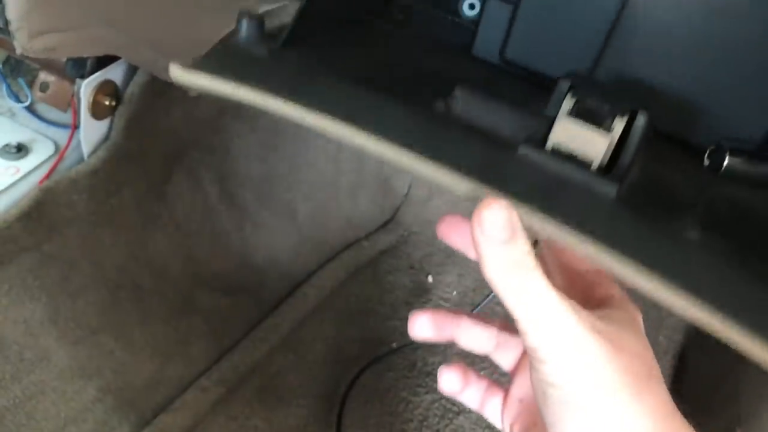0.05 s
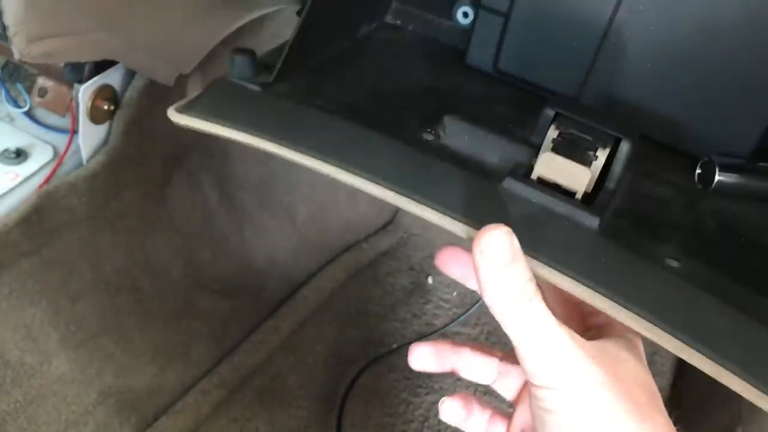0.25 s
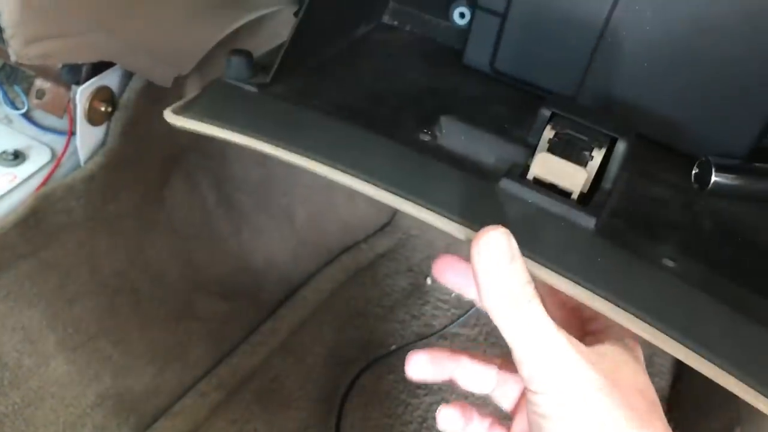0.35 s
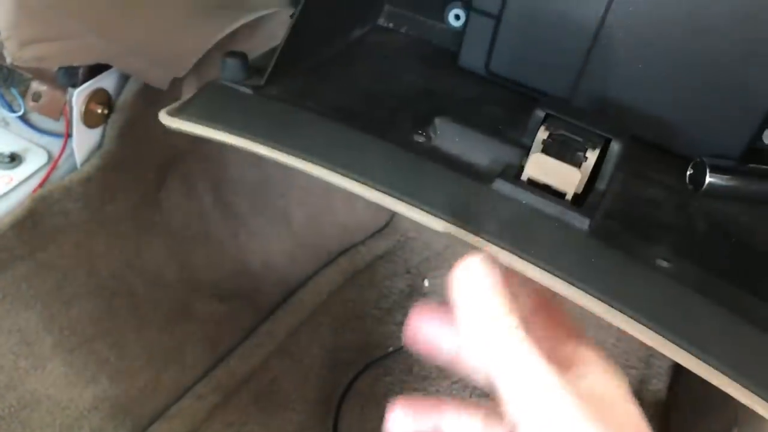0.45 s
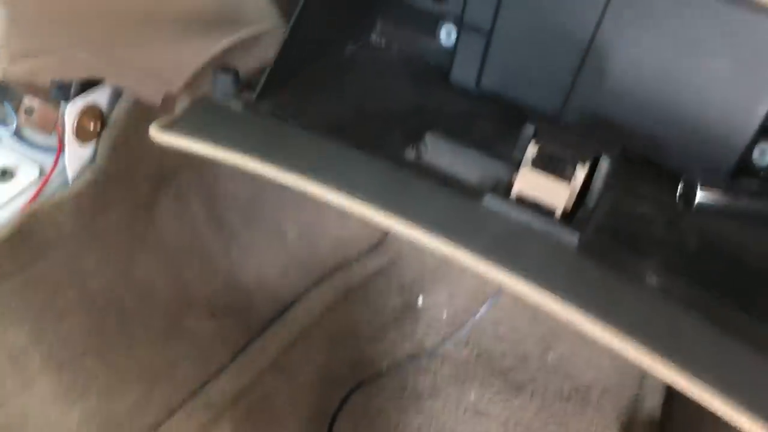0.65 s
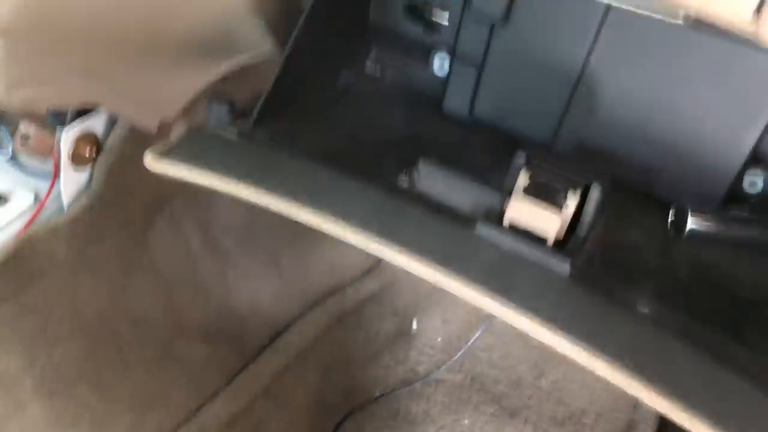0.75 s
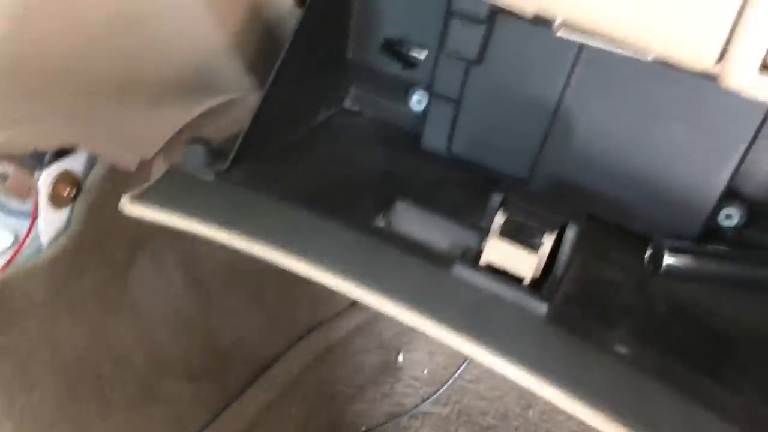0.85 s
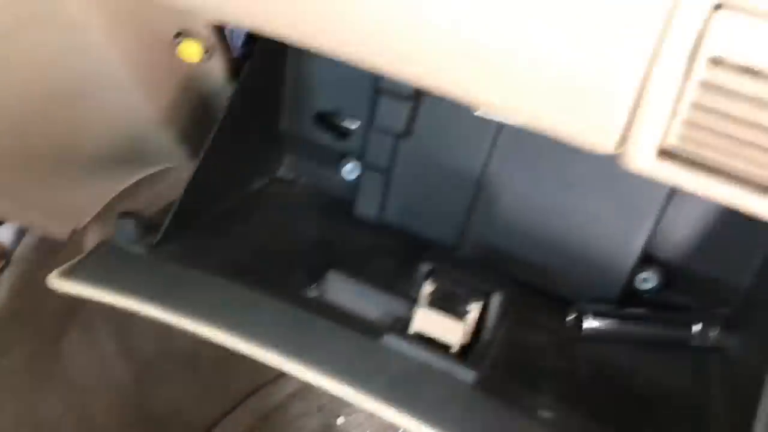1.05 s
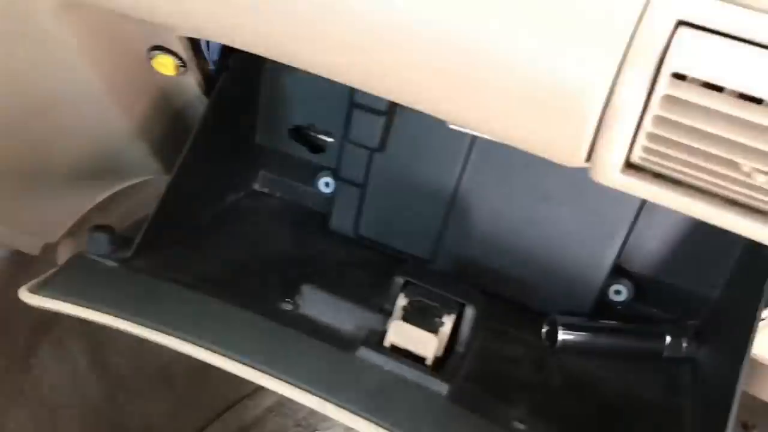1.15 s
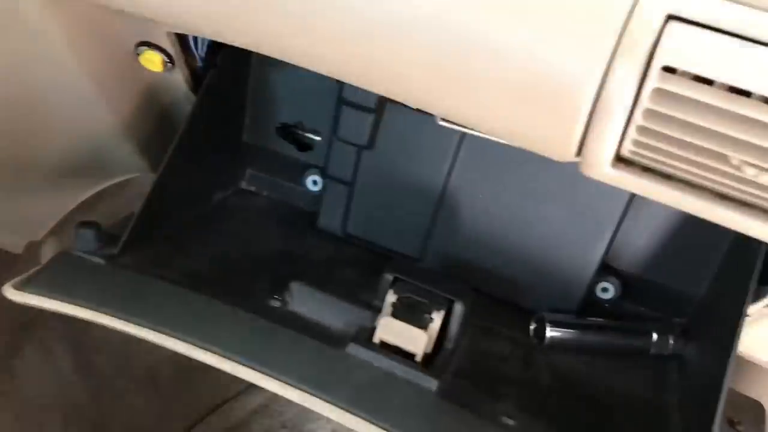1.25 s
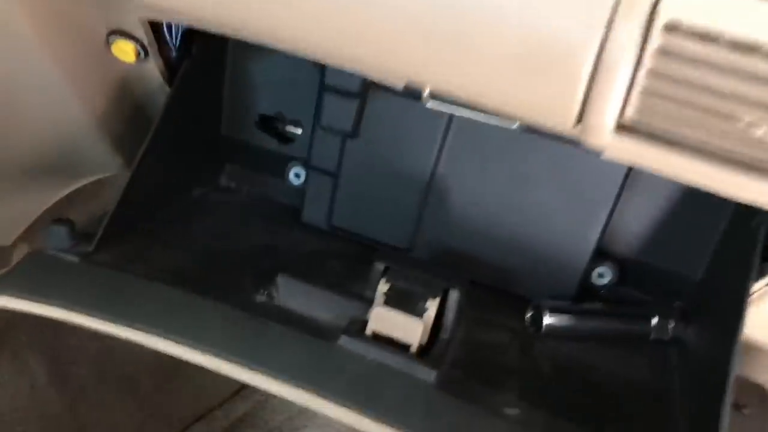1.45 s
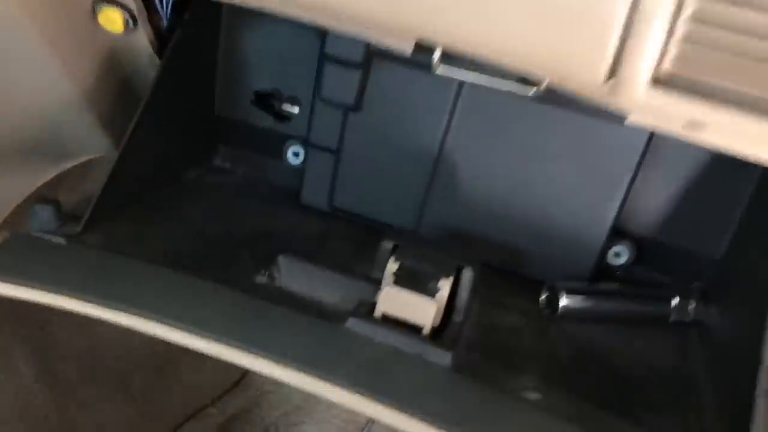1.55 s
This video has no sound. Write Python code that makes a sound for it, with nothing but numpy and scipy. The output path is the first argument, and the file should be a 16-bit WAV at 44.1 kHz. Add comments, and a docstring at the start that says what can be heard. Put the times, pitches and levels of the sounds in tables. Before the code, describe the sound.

Close by in a quiet, softly rumbling car, a glove compartment unlatches and its plastic lid creaks down, thuds against its stop and rebounds with a small rattle. Faint cloth rustling follows.

```python
"""A low rumble fills a quiet car as, close by, the glove compartment clicks and falls open.
The plastic lid scrapes and groans on its way down, and the latch clicks sharply.
The lid knocks against its stop, ringing the box behind it, then booms and rebounds while
loose parts rattle. The cabin adds a short echo. Afterwards a sleeve rustles faintly."""
import sys
import numpy as np
from scipy import signal
from scipy.fft import rfft, irfft
from scipy.io import wavfile

SR = 44100
rng = np.random.default_rng(int(sys.argv[2]) if len(sys.argv) > 2 else 0)


def master_out(mix):
    """Clip the mix to full scale and print it as 16-bit PCM to the path in sys.argv[1]."""
    frames = np.transpose(np.atleast_2d(mix))
    ceiling = np.clip(frames, -1, 1)
    pcm = np.round(ceiling * 32767).astype(np.int16)
    wavfile.write(sys.argv[1], SR, pcm)


N = 70560  # 1.6 seconds

# The cabin's rumble. Each row: frequency in Hz, strength in dB.
CABIN_COLOUR = [(15, -37), (27, -10), (40, 6.5), (75, -1), (92, -9), (113, -0.5), (140, -5), (200, -13),
                (300, -15.5), (430, -27.5), (700, -23), (1250, -24.5), (2700, -38), (4200, -40.5),
                (6000, -47), (15500, -51)]
# How fast the hum wavers. Each row: rate in Hz, strength in dB.
HUM_WAVER_RATES = [(1, 0), (12, 0), (40, -40), (1000, -100)]
CABIN_DB, HUM_DB, HUM_HZ, HUM_WAVER_HZ = -49, -52, 112.3, 5

# Latch and hinge clicks. Each row: start in seconds, level in dB, brightness in dB per octave.
LATCH_CLICKS = [(0.026, -48, -1), (0.1637, -42, 11), (.184, -40, 1.5), (.1975, -39, 7), (0.221, -26, 2.5),
                (0.2233, -36.5, -3.5), (0.2627, -35, 1.5), (0.3214, -44, 7), (0.3242, -35.5, 12),
                (0.349, -49, 5), (0.3772, -51, 8), (0.3965, -52, 10.5)]
# The tone of a click. Each row: frequency in Hz, strength in dB, seconds to fade by 60 dB.
LATCH_BANDS = [(247.24, -5.5, 0.15), (1100, 0.5, 0.045), (2130, -0.5, 0.041), (2780, -6, 0.033),
               (4100, -2, 0.04), (6700, -1, 0.028), (9970, -18.5, 0.057), (15552, -10.5, 0.025)]

# Blows on the lid: latch, hard stop, rebound, last taps. Each row: start in seconds,
# lid level in dB, box level in dB, panel level in dB, brightness in dB per octave.
LID_BLOWS = [(.0278, -54, -48.5, -49, 2), (0.224, -30, -66, -41.5, -1.5), (0.228, -47.5, -67, -57, -9),
             (0.2437, -12, -42, -20, 1), (0.2475, -4, -32, -19, 1), (0.3268, -31, -67, -38.5, -1.5),
             (0.332, -39.5, -35.5, -36, 1), (0.335, -37.5, -37.5, -46.5, -4.5),
             (0.3396, -40, -44.5, -40, -2.5), (0.3451, -48.5, -48, -37.5, -2.5),
             (0.3802, -57, -48, -48, -0.5), (.3991, -51, -47, -49.5, -1.5), (0.851, -70, -67, -56, -7.5)]
# The plastic lid's ringing notes. Each row: pitch in Hz, level in dB, seconds to fade by 60 dB.
LID_NOTES = [(179.87, -8.5, 0.052), (231, -5.5, 0.032), (335.4, -8, .045), (684, -11.5, 0.05),
             (1223.6, -9, 0.03), (1477, -20, 0.022), (1741, -8.5, 0.031), (2010, 3.5, 0.021),
             (2135, -12.5, .035), (2260, -14.5, 0.044), (2532, -16.5, 0.023), (3070, -23, 0.036),
             (3510, -39.5, 0.24)]
# The storage box's hollow notes. Each row: pitch in Hz, level in dB, seconds to fade by 60 dB.
BOX_NOTES = [(395.65, -4.5, 0.056), (565, -3, 0.041), (683, -9.5, .065), (801, -18.5, .065),
             (1030.5, -5, .05), (1371.7, -5.5, .05)]
BOX_DETUNE = 0.029  # each blow shifts the box's notes by about this share
# Clattering dashboard panels. Each row: frequency in Hz, strength in dB, seconds to fade by 60 dB.
CLATTER_BANDS = [(105, -5, 0.26), (204, 5, 0.11), (348.3, -7, 0.21746), (719.89, -1, 0.095),
                 (1410, -8.5, 0.078), (2201, -6.5, .05), (2720, -11.5, 0.029), (4500, -21.5, 0.0974),
                 (6124.1, -38, .09), (8060, -30, .08), (15500, -38.5, .08)]

# The lid rubbing as it falls and rebounds. Each row: time in seconds, level in dB.
SCRAPE_LEVELS = [(0.049, -69), (.1, -64), (.17, -48.5), (.21, -45), (.243, -40), (.285, -45.5), (.31, -57),
                 (.335, -56.5), (.37, -65)]
# The tone of that rubbing. Each row: frequency in Hz, strength in dB.
SCRAPE_COLOUR = [(80, -8.5), (140, 7), (350, -5), (650, -8), (1000, -2.5), (2000, -11), (2700, -13),
                 (7000, -17), (15500, -26.5)]
# Groans of rubbing plastic. Each row: start in seconds, length in seconds, starting pitch in Hz,
# level in dB, roughness from 0 to 1.
PLASTIC_GROANS = [(0.1, 0.045, 1842, -56, .95), (0.134, 0.11, 617.4, -45, 0.5)]
GROAN_OCTAVES_PER_S, RASP_WIDTH = 1.2, .14  # upward glide; width as a share of the pitch

# The open lid's boom before it slows and sinks.
# Each row: pitch in Hz, level in dB, seconds to fade by 60 dB.
BOOM_NOTES = [(55.8, -37, .9), (71.27, -21.5, .66), (115.7, -32.5, 0.45), (142.9, -26, .45)]
# How fast the boom shudders. Each row: rate in Hz, strength in dB.
SHUDDER_RATES = [(1, -10), (30, 0), (80, -30), (1000, -100)]
BOOM_START_S, BOOM_HALF_PITCH_S, SHUDDER_DEPTH = .2528, .68, .18

# Loose latch parts rattling. Each row: start in seconds, level in dB, seconds to fade by 60 dB.
RATTLES = [(.256, -41, .16), (.337, -58, 0.11)]
# The tone of the rattle. Each row: frequency in Hz, strength in dB.
RATTLE_COLOUR = [(900, -16.5), (2300, 1.5), (5500, -8), (15500, -14)]

# Strokes of the sleeve. Each row: start in seconds, length in seconds, level in dB,
# brightness in dB per octave.
SLEEVE_STROKES = [(0.851, 0.26, -65.5, -2.5), (.956, 0.015, -59.5, -3.5), (1.002, 0.41, -65, -3.5),
                  (1.141, 0.089, -56.5, 4), (1.197, 0.11, -55.5, 2), (1.502, 0.11646, -65.5, -2)]
# The tone of rubbing cloth. Each row: frequency in Hz, strength in dB.
CLOTH_COLOUR = [(300, -8), (1100, 4.5), (2500, 2.5), (4200, -0.5), (7500, -2.5), (11000, -3), (15500, 1)]

ECHO_DB, ECHO_FADE_S, ECHO_DELAY_S = -29, 0.24, 0.0027
LOW_CUT_HZ, HIGH_CUT_HZ = 30, 15950


def amp(db):
    """Turns decibels into a number to multiply by."""
    return 10 ** (np.asarray(db) / 20)


def unit(x):
    """Scales a sound to an average power of 1."""
    return x / np.sqrt(np.mean(x ** 2) + 1e-20)


def fade(t, fade_s):
    """A curve that falls by 60 dB in fade_s seconds."""
    return np.exp(-np.log(1000) * t / fade_s)


def add(mix, start, sound):
    """Mixes a sound in at a start time in seconds."""
    part = mix[max(round(start * SR), 0):][:len(sound)]
    part += sound[:len(part)]


def tilt(hz, brightness):
    """Tips the balance of bass and treble around 2000 Hz, in dB per octave."""
    return amp(brightness * np.log2(np.maximum(hz, 250) / 2000))


def colour(x, points, brightness=0):
    """Shapes a sound's lows and highs from a table, at an average power of 1."""
    hz = np.fft.rfftfreq(len(x), 1 / SR)
    point_hz, db = np.transpose(points)[:2]
    gain = amp(np.interp(np.log(hz + 1), np.log(point_hz), db))
    return unit(irfft(rfft(x) * gain * tilt(hz, brightness), len(x)))


def burst(bands, brightness, rise_s):
    """Noise like countless tiny rings struck at once; each band fades at its own speed."""
    t = np.arange(SR // 2) / SR
    hz = np.fft.rfftfreq(len(t), 1 / SR)
    spectrum = rfft(colour(rng.choice([-1., 1.], len(t)), bands, brightness))
    band_hz, _, fade_times = np.transpose(bands)
    out = np.zeros(len(t))
    for one_band, fade_s in zip(np.eye(len(bands)), fade_times):
        share = np.interp(np.log(hz + 1), np.log(band_hz), one_band)
        out += irfft(spectrum * share, len(t)) * fade(t, fade_s)
    return out * (1 - np.exp(-t / rise_s))


def ring(notes, brightness, rise_s):
    """A struck part rings with a few pure notes that die away."""
    t = np.arange(SR) / SR
    out = sum(amp(db) * tilt(hz, brightness) * fade(t, fade_s) * np.sin(2 * np.pi * hz * t)
              for hz, db, fade_s in notes)
    return out * (1 - np.exp(-t / rise_s))


def grains(per_s, spread_db):
    """Tiny slips of uneven size at random moments."""
    size = amp(spread_db * np.minimum(rng.exponential(1, N), 4))
    return size * rng.choice([-1., 1.], N) * (rng.random(N) < per_s / SR)


def cabin():
    """Steady low rumble, a wavering hum and faint hiss inside the car."""
    hum_hz = HUM_HZ + HUM_WAVER_HZ * colour(rng.standard_normal(N), HUM_WAVER_RATES)
    hum = unit(np.sin(2 * np.pi * np.cumsum(hum_hz) / SR))
    rumble = colour(rng.standard_normal(N), CABIN_COLOUR)
    return amp(CABIN_DB) * rumble + amp(HUM_DB) * hum


def latch():
    """The latch and hinge give sharp, dry clicks."""
    out = np.zeros(N)
    for start, db, brightness in LATCH_CLICKS:
        add(out, start, amp(db) * burst(LATCH_BANDS, brightness, rise_s=.0002))
    return out


def lid_knocks():
    """Each blow rings the lid and the box behind it and shakes the panels."""
    out = np.zeros(N)
    for start, lid_db, box_db, panel_db, brightness in LID_BLOWS:
        box = [(hz * (1 + BOX_DETUNE * rng.standard_normal()), db, fade_s)
               for hz, db, fade_s in BOX_NOTES]
        add(out, start, amp(lid_db) * ring(LID_NOTES, brightness, rise_s=0.0015))
        add(out, start, amp(box_db) * ring(box, brightness, rise_s=0.00051))
        add(out, start, amp(panel_db) * burst(CLATTER_BANDS, brightness, rise_s=0.00039))
    return out


def cabin_echo(x):
    """Sound bounces off the trim and the footwell and dies quickly in the padded cabin."""
    t = np.arange(SR // 2) / SR
    tail = rng.standard_normal(len(t)) * fade(t, ECHO_FADE_S) * (t > ECHO_DELAY_S)
    return amp(ECHO_DB) * signal.fftconvolve(x, tail / np.linalg.norm(tail))[:N]


def lid_scrape():
    """Plastic slips on plastic, harder as the lid falls, and groans briefly with rising pitch."""
    slips = grains(per_s=3500, spread_db=2.5)
    times, levels = np.transpose(SCRAPE_LEVELS)
    scrape_db = np.interp(np.arange(N) / SR, times, levels, left=-np.inf, right=-np.inf)
    out = amp(scrape_db) * colour(slips, SCRAPE_COLOUR)
    hz = np.fft.rfftfreq(N, 1 / SR)
    for start, length, pitch_hz, db, rough in PLASTIC_GROANS:
        t = np.arange(int(length * SR)) / SR
        rising_hz = pitch_hz * 2 ** (GROAN_OCTAVES_PER_S * t)
        tone = np.sin(2 * np.pi * np.cumsum(rising_hz) / SR)
        # The rasp is the part of the slips near the starting pitch.
        off_pitch = (hz / pitch_hz - 1) / RASP_WIDTH
        rasp = irfft(rfft(slips) / (1 + 1j * off_pitch) ** 2, N)[:len(t)]
        groan = unit((1 - rough) * unit(tone) + rough * unit(rasp))
        add(out, start, amp(db) * np.sin(np.pi * t / length) * groan)
    return out


def lid_boom():
    """The lid's weight swings on its stop: a low boom that shudders and sinks in pitch."""
    out, t = np.zeros(N), np.arange(SR) / SR
    slowing_time = BOOM_HALF_PITCH_S * np.arctan(t / BOOM_HALF_PITCH_S)
    boom = np.interp(slowing_time, t, ring(BOOM_NOTES, brightness=0, rise_s=0.0056))
    shudder = 1 + SHUDDER_DEPTH * colour(rng.standard_normal(SR), SHUDDER_RATES)
    add(out, BOOM_START_S, boom * shudder)
    return out


def latch_rattle():
    """After a blow, loose parts tick at random, ever more softly."""
    out, t = np.zeros(N), np.arange(N) / SR
    tick = rng.standard_normal(N) * np.exp(-t / .0006)  # one tiny snap of noise
    for start, db, fade_s in RATTLES:
        ticks = signal.fftconvolve(grains(per_s=990, spread_db=4), tick)[:N]
        add(out, start, amp(db) * fade(t, fade_s) * colour(ticks, RATTLE_COLOUR))
    return out


def sleeve():
    """Thousands of tiny cloth rubs blend into soft strokes that swell and fade."""
    out = np.zeros(N)
    for start, length, db, brightness in SLEEVE_STROKES:
        swell = np.sin(np.linspace(0, np.pi, int(length * SR)))
        rubs = colour(grains(per_s=12000, spread_db=3), CLOTH_COLOUR, brightness)
        add(out, start, amp(db) * swell * rubs[:len(swell)])
    return out


def scene():
    """Adds all the sounds into one channel; only the glove compartment gets an echo."""
    compartment = latch() + lid_knocks() + lid_boom() + latch_rattle() + lid_scrape()
    return (compartment + cabin_echo(compartment) + sleeve() + cabin())[None]


def record(dry):
    """Trims away the deepest bass and the highest treble."""
    low_cut = signal.butter(2, LOW_CUT_HZ, "high", fs=SR, output="sos")
    high_cut = signal.firwin(511, HIGH_CUT_HZ, window=("kaiser", 9), fs=SR)
    return signal.oaconvolve(signal.sosfilt(low_cut, dry), high_cut[None], "same")


dry = scene()
out = record(dry)
master_out(out)
```